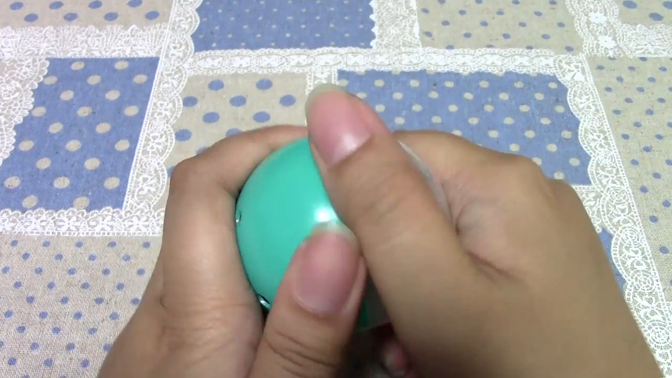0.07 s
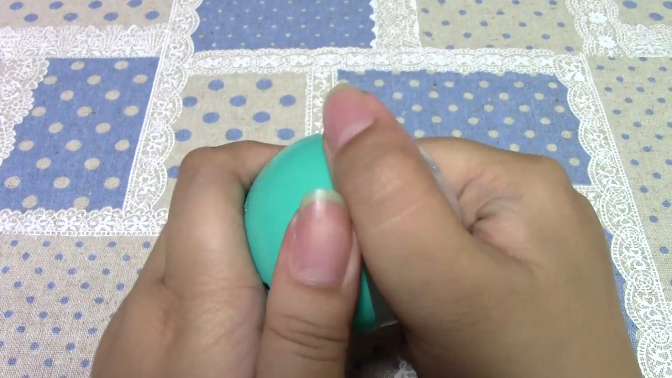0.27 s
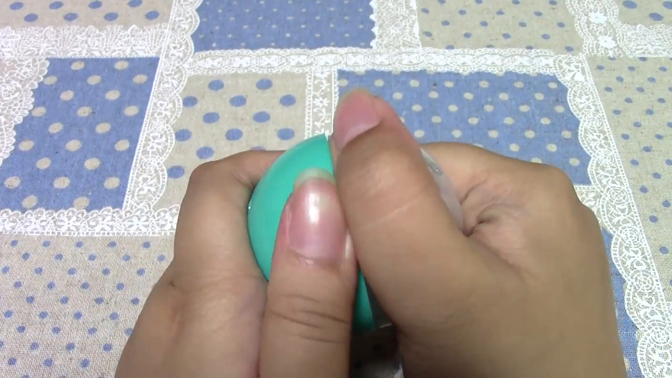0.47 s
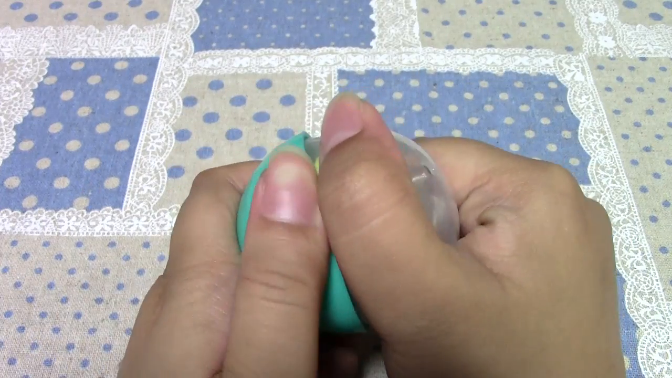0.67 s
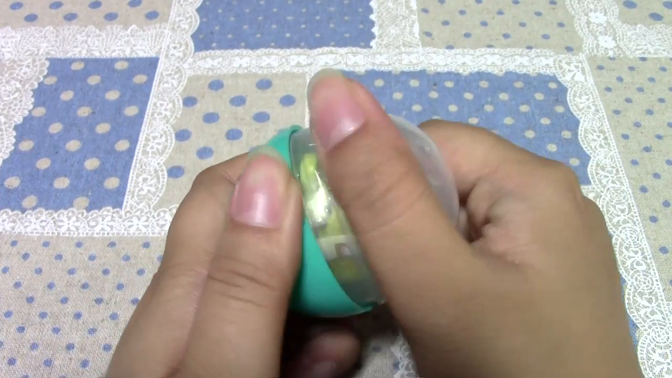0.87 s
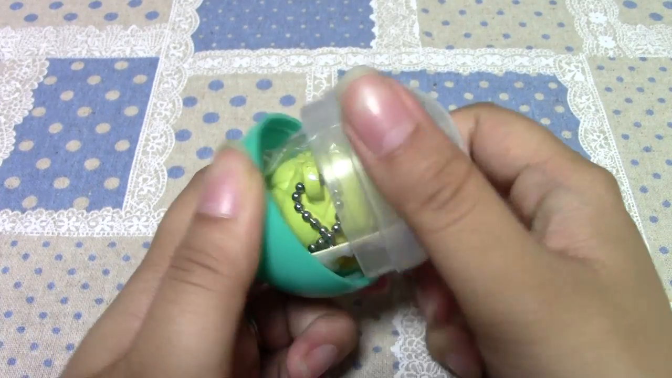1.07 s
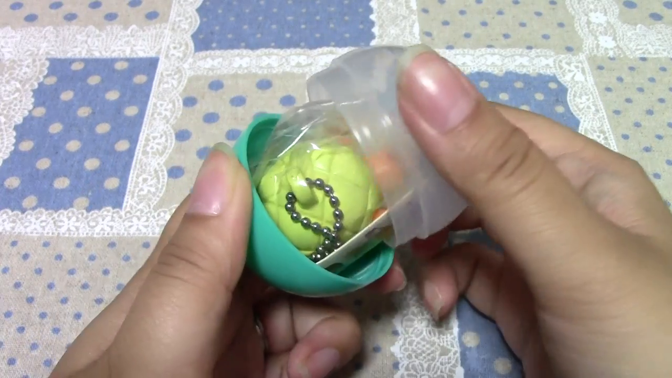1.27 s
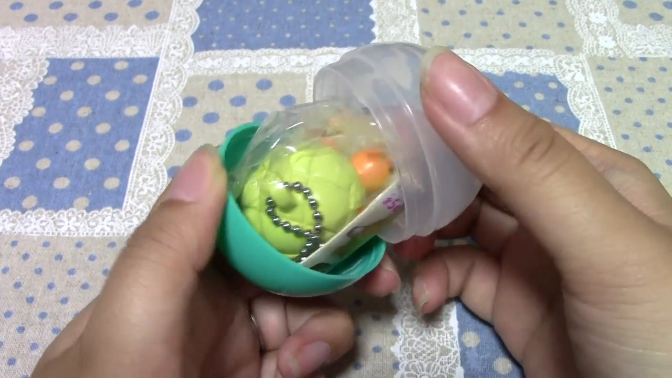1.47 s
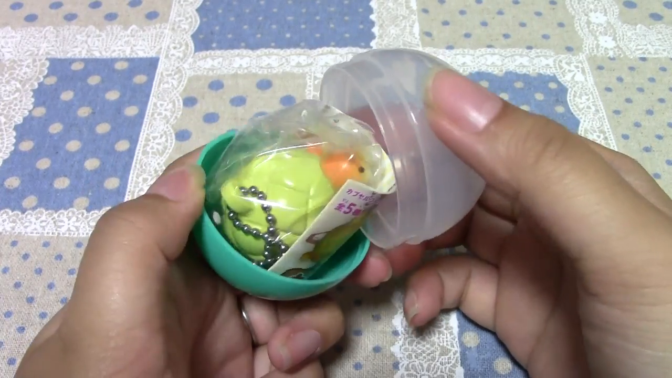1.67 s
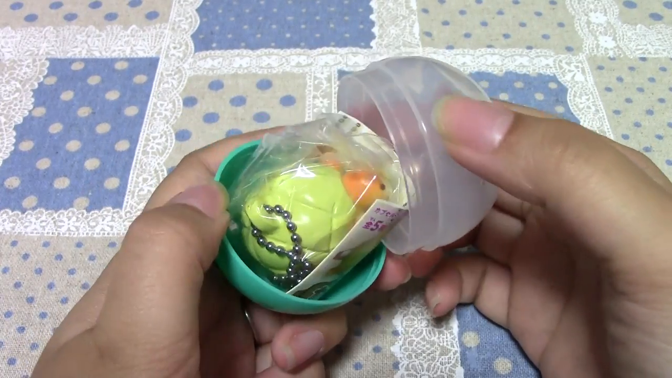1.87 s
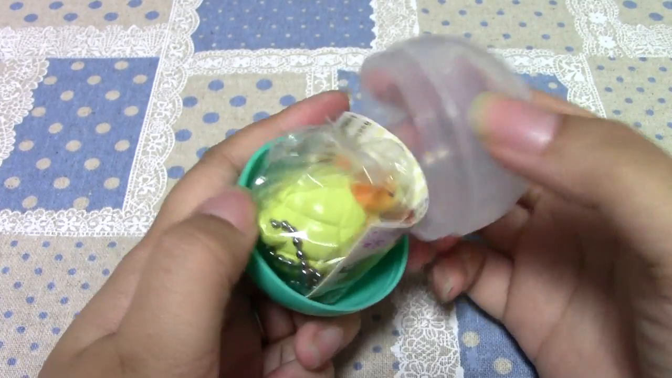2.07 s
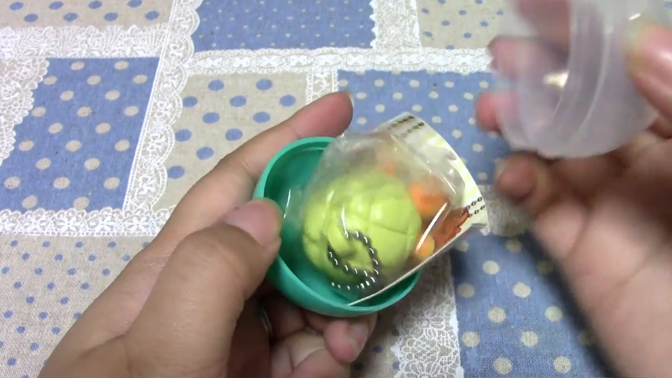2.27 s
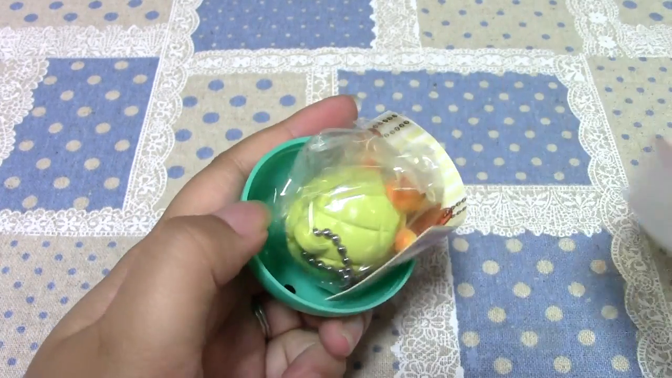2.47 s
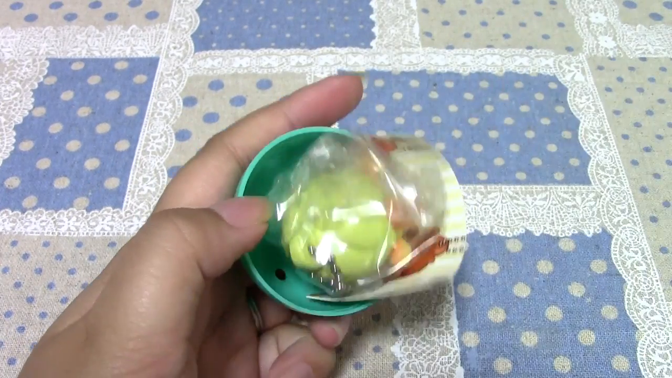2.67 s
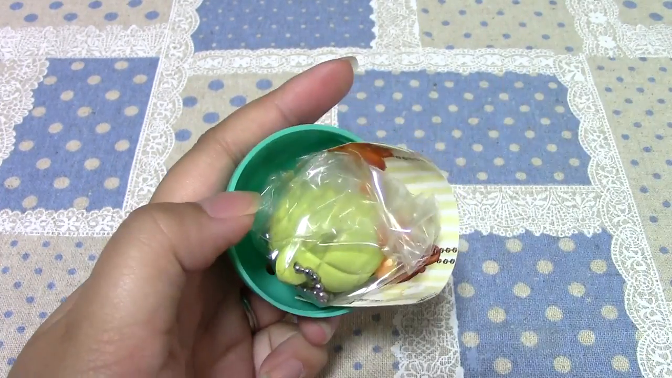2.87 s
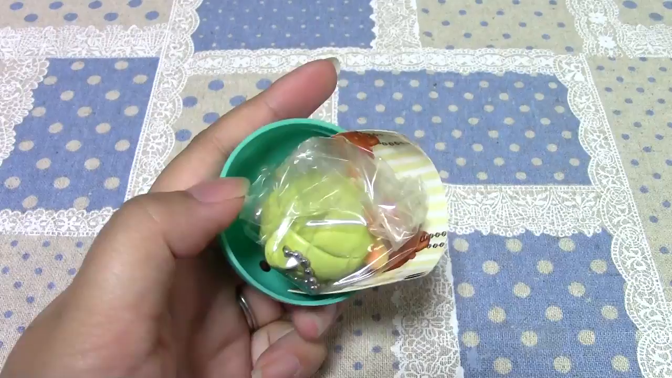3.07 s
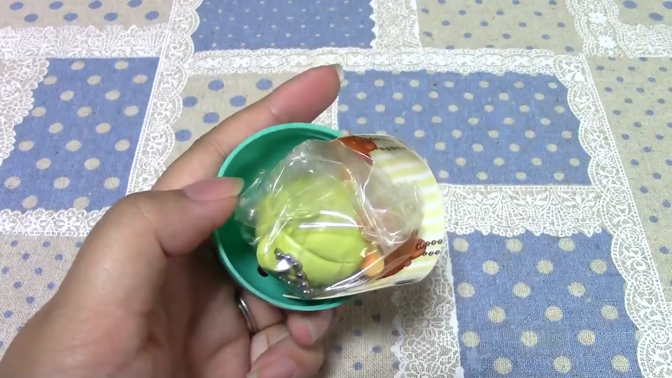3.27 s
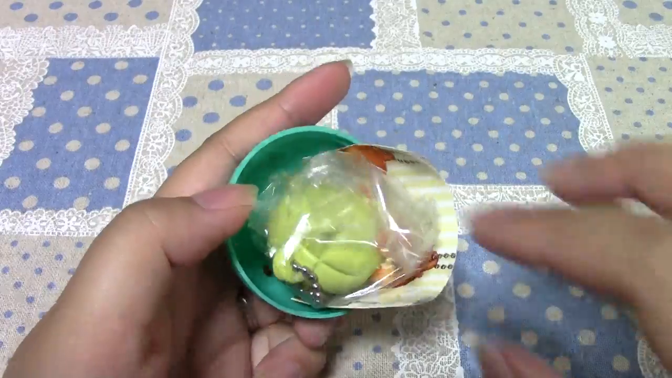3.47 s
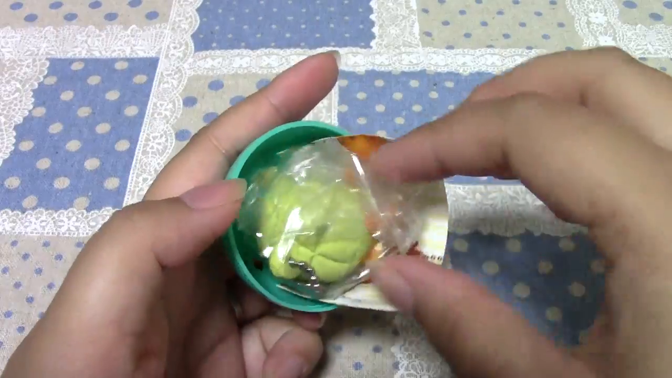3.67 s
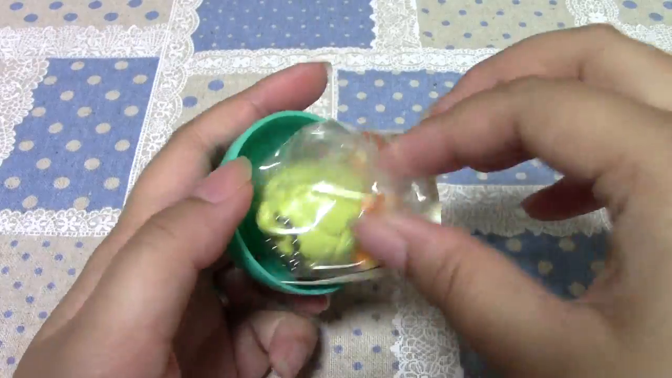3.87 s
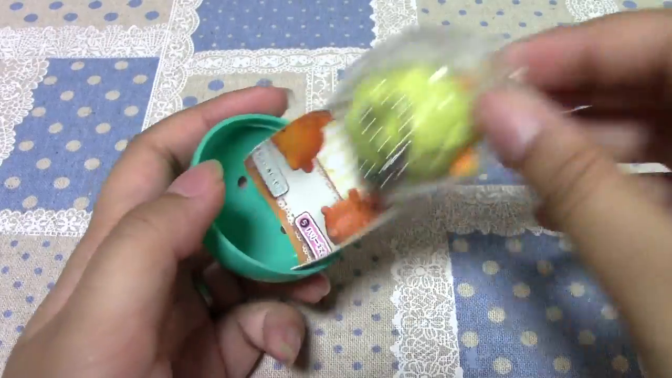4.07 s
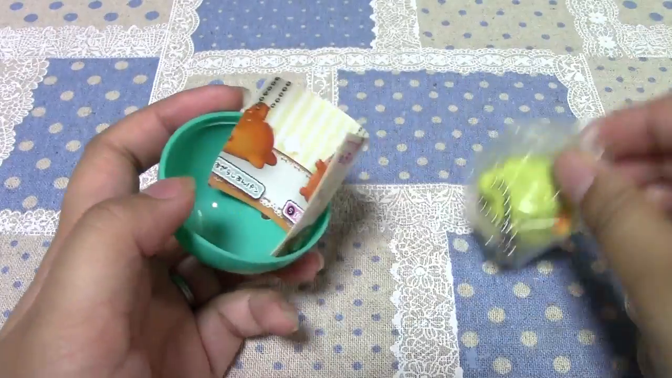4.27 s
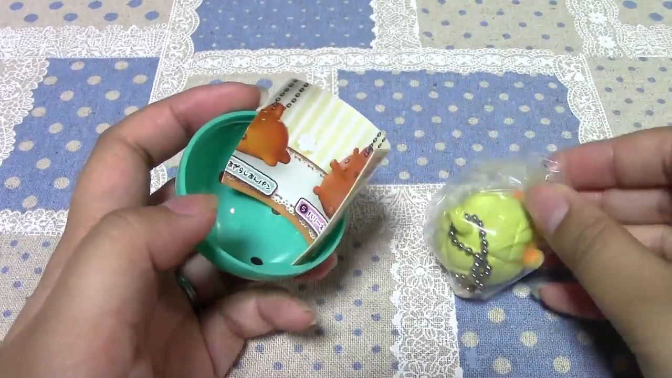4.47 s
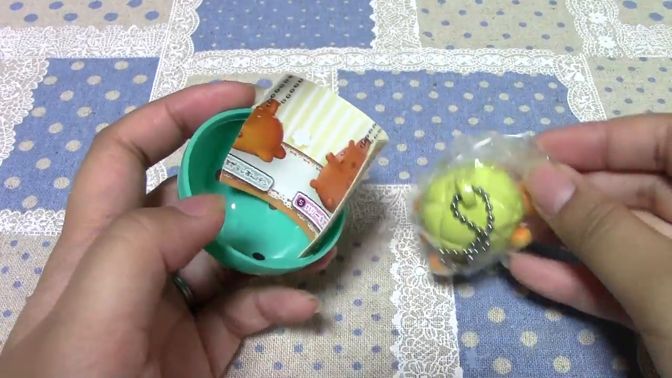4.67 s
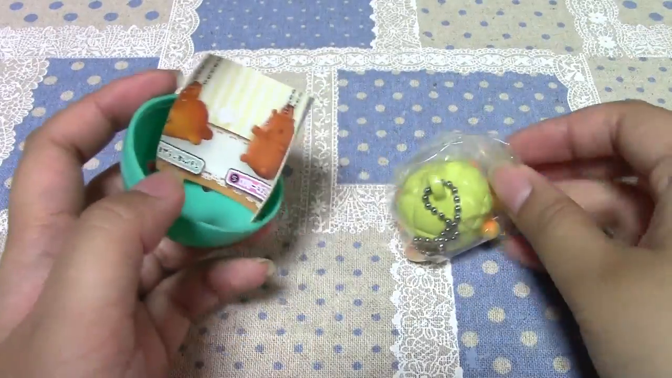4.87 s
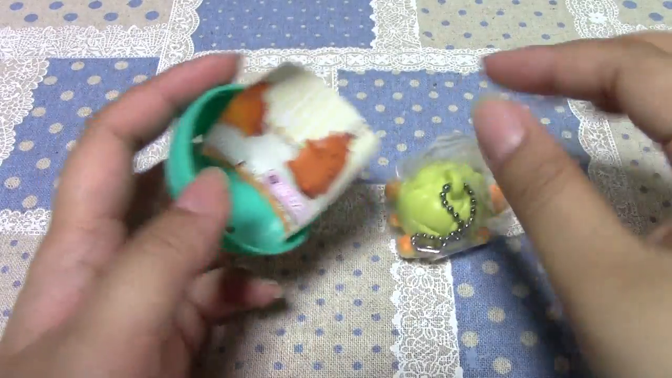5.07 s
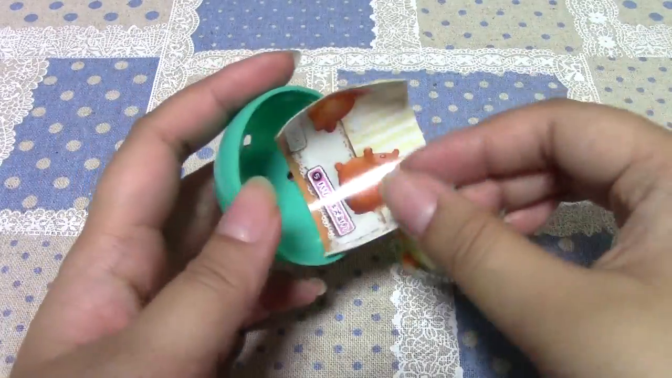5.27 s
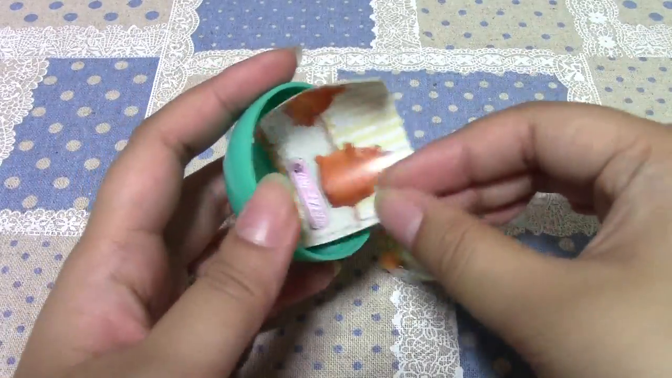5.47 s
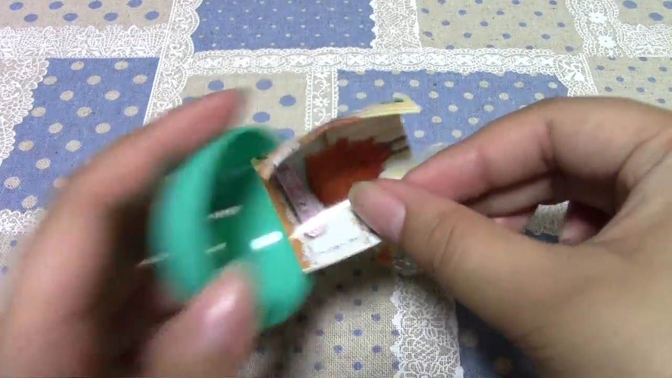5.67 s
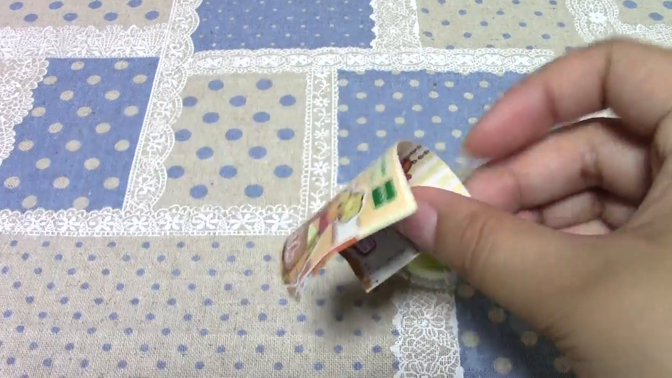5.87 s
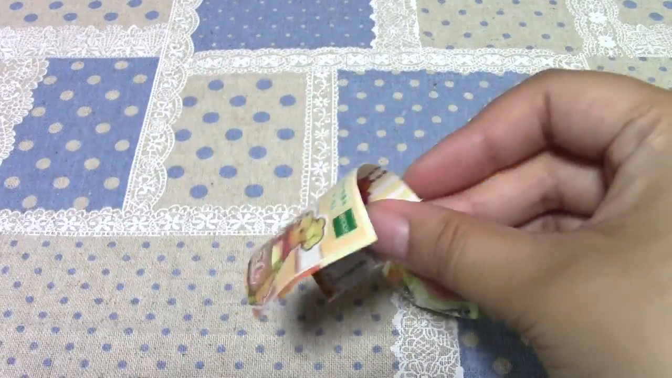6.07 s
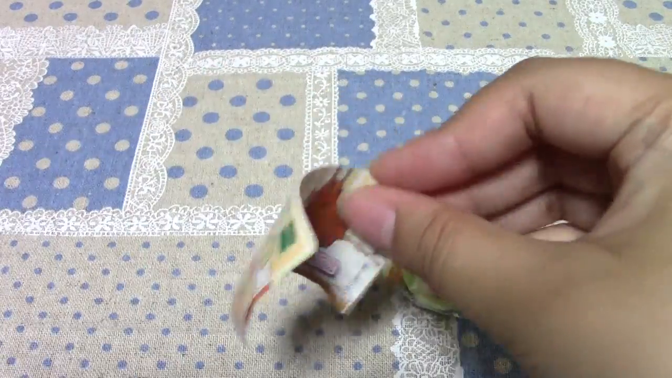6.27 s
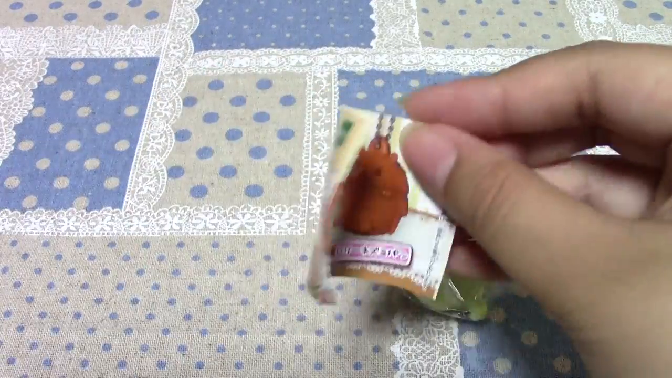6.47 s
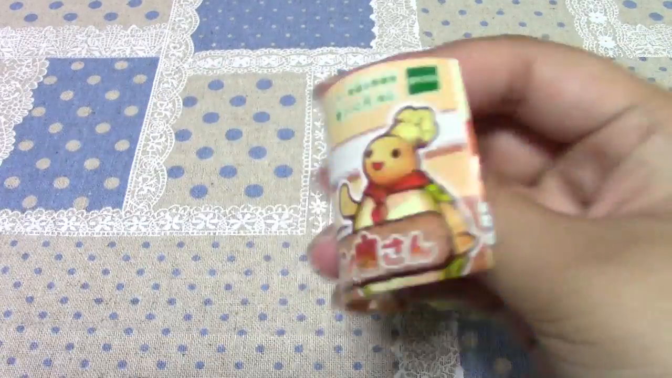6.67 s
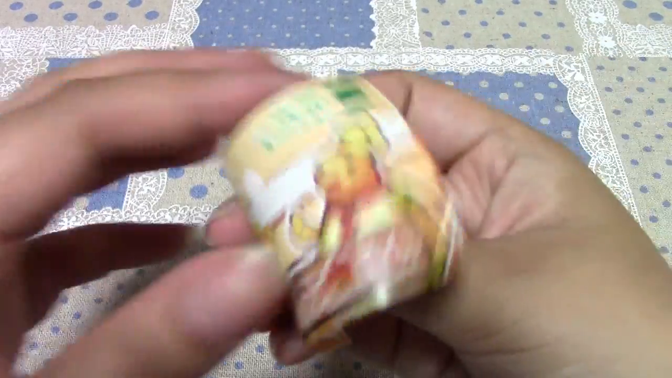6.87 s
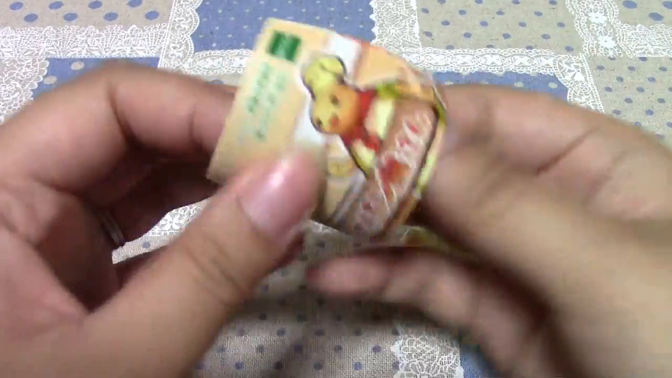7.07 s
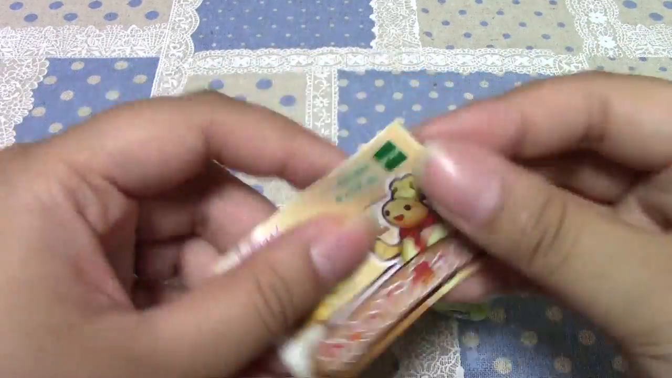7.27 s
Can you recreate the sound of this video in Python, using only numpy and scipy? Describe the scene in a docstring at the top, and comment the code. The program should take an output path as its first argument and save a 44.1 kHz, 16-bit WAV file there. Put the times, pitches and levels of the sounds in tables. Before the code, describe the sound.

Close handling in a quiet room: sharp plastic snap, crisp film crackles, small knocks on a cloth-covered table, a short hollow clatter, papery rustles and flicks.

```python
"""A quiet room with a cloth-covered table: hands pop a plastic toy capsule open close to the microphone.
The toy in its thin bag is lifted out and set down, crinkling; a paper insert is pulled out and unrolled,
and an empty capsule half lands with a short clatter. Plastic is made from cracks and damped resonances,
film and paper from friction hiss, stick-slip grains and ringing creases, the landing from ticks, shell
modes and a noise rattle; a faint room tail and a humming room tone lie underneath."""
import sys
import numpy as np
from scipy import signal
from scipy.fft import rfft, irfft, next_fast_len
from scipy.io import wavfile
from scipy.ndimage import uniform_filter1d

SR = 44100
rng = np.random.default_rng(int(sys.argv[2]) if len(sys.argv) > 2 else 0)


def wav_out(sig):
    """Save sig, one row per channel (or a flat mono array), as 16-bit PCM at SR to the path in sys.argv[1]."""
    wavfile.write(sys.argv[1], SR, np.round(np.clip(np.atleast_2d(sig).T, -1, 1) * 32767).astype(np.int16))


N = 322805

# Colour of the room's air noise. Each row: frequency in Hz, relative density in dB per Hz.
ROOM_TONE_SPECTRUM = [(20, -81.5), (48, -75), (100, -77.5), (150, -76), (300, -83), (600, -83),
                      (750, -84.5), (950, -86.5), (1200, -86.5), (2200, -93), (5500, -99), (8000, -102),
                      (12000, -105), (16000, -111)]
# Steady hum of the room. Each row: frequency in Hz, level in dB.
HUM_LINES = [(697, -71), (728, -67), (825, -69)]
# Likeness of the room tone at the two microphone ports. Each row: frequency in Hz, correlation from 0 to 1.
PORT_LIKENESS = [(40, 0.99), (150, 0.64), (300, 0.037), (700, 0.47), (3000, 0.76), (12000, 0.6)]
# Ring time of the room tail. Each row: frequency in Hz, time to fall 60 dB in seconds.
ROOM_RING_TIME = [(200, 0.91), (1000, 0.37), (4000, 0.46), (14000, 0.12)]

# Soft bumps of hands, toy and shell. Each row: start in seconds, level in dB, pitch in Hz.
BUMP_EVENTS = [(2.951, -41, 313), (2.959, -40.5, 220), (4.97, -41.5, 176), (6.352, -35.5, 95),
               (6.375, -33, 480), (6.629, -42.5, 290), (6.753, -42, 264), (7.2795, -27, 450)]
# Hollow plastic or curled paper scraping. Each row: start in seconds, level in dB, resonance in Hz,
# resonance width in Hz, rise in ms, decay in ms.
SCRAPE_EVENTS = [(.696, -24, 1140, 700, 7.9, 5.2), (0.962, -32, 1250, 650, 8.1, 4),
                 (1.029, -42.5, 1400, 1490, 2.6, 3), (0.984, -36, 1160, 260, 5.1, 12),
                 (1.15, -58.5, 1850, 400, 59, 220), (4.459, -35, 730, 880, 9.6, 31),
                 (6.373, -30, 1460, 450, 7.6, 14), (6.506, -42.5, 1044, 1130, 6.2, 23),
                 (7.051, -44, 3950, 600, 16, 42), (7.14, -45, 4550, 1400, 40, 22),
                 (7.186, -43, 2960, 1200, 17, 11)]
# Paper edges flicking past a finger. Each row: start in seconds, level in dB, rise in ms, decay in ms.
FLICK_EVENTS = [(6.801, -27.5, 3.4, 5.9), (7.0255, -35.5, 0.83, 1.8), (7.063, -27, 8.5, 8.4),
                (7.28, -20, 0.4, 2.7)]

# The empty shell touching down. Each row: contact time in seconds, rattle level in dB, tick level in dB.
LANDING_CONTACTS = [(6.3493, -32.5, -26.5), (6.3536, -29.5, -30), (6.363, -42, -34.5), (6.3765, -31, -48)]
# Modes of the empty shell. Each row: frequency in Hz, sine peak in dB against the rattle's early rms,
# time to fall 60 dB in seconds.
SHELL_RING = [(1080, -1, 0.2), (1446, -6, 0.16), (2772, -21, 0.21)]
# Colour of the landing rattle. Each row: frequency in Hz, relative density in dB per Hz.
RATTLE_SPECTRUM = [(40, -11), (85, -1.5), (200, -15), (480, -2), (800, -6.5), (1200, -0.5), (1600, -3.5),
                   (2200, -7.5), (4200, -16), (6000, -17), (10000, -26), (16000, -37)]
# Ring time of the landing rattle. Each row: frequency in Hz, time to fall 60 dB in seconds.
RATTLE_RING_TIME = [(100, 0.19), (1300, 0.27), (4000, 0.27), (12000, 0.22)]

# Fingers sliding along the paper insert: drawn out, regripped, turned over, unrolled. Each row: middle in
# seconds, length in seconds, level in dB, small creases per second (a count that rounds to zero gives none).
PAPER_SLIDES = [(5.435, 0.17, -53.5, 0), (5.65, 0.12, -47.5, -2), (5.765, 0.097, -49, 0),
                (6.0, 0.052, -44.5, 0), (6.13, 0.24, -61, 13.5), (6.18, 0.021, -46.5, 0),
                (6.28, 0.026, -51, 120), (6.5, 0.5, -57.5, 8), (6.825, 0.064, -53, 0),
                (7.085, 0.045, -40, 0), (7.192, 0.069, -41, 0), (7.255, 0.029, -43, -2),
                (7.312, 0.043, -41.5, 0)]
# Fingers sliding on the capsule and the bag: gripping, unfolding, lifting, setting down, letting go. Each row:
# middle in seconds, length in seconds, level in dB, small creases per second (rounding to zero gives none).
FILM_SLIDES = [(0.7, 2.7, -61.5, 7), (0.48, 0.16, -57, 0), (1.23, 0.14, -57, 25), (2.222, 0.051, -47, 60),
               (2.29, 0.15, -52, 1.5), (2.48, 0.17, -53.5, 0), (2.776, 0.02, -49.5, -6),
               (2.862, 0.041, -47, 0), (3.17, 0.11, -61.5, 15), (3.775, 0.06, -45, 0),
               (3.838, 0.095, -44, 90), (4.01, 0.14, -46.5, 130), (4.098, 0.028, -52.5, 120),
               (4.31, 0.13, -54, 35), (4.402, 0.028, -53.5, 0), (4.484, 0.034, -36.5, 0),
               (4.534, 0.04, -46, -2), (4.705, 0.12, -51, 40), (4.858, 0.06, -51.5, 0.5),
               (4.995, 0.081, -46, 0), (5.096, 0.087, -44.5, 0), (5.215, 0.12, -57, 0)]
# Colour of rubbed paper. Each row: frequency in Hz, relative density in dB per Hz.
PAPER_SPECTRUM = [(200, -15), (700, -13.5), (1600, -7.5), (2700, 2), (3200, -0.5), (3900, 3), (5300, -4.5),
                  (7000, -2), (11000, 1.5), (16000, -5)]
# Colour of rubbed film. Each row: frequency in Hz, relative density in dB per Hz.
FILM_SPECTRUM = [(200, -43), (700, -1.5), (1500, -3.5), (2600, -0.5), (3500, -1.5), (5300, -6.5),
                 (7300, -1.5), (10500, -3.5), (13000, -4), (16000, -10)]

# Big creases of film or paper snapping over. Each row: start in seconds, ring level in dB, ring pitch in Hz,
# treble tick level in dB, level in dB of what it lies on.
BIG_CREASES = [(1.2443, -57, 4570, -42.5, -63), (2.2207, -47, 3000, -45, -45.5),
               (2.411, -49, 2000, -49, -46), (2.681, -53, 2540, -52.5, -52), (3.595, -66, 1900, -52, -58),
               (3.7317, -38.5, 2800, -36.5, -56), (3.7412, -15.5, 2740, -21.5, -31),
               (3.78, -47, 3440, -35.5, -45), (3.801, -47, 2800, -41, -52), (3.9273, -41, 2686, -45, -52),
               (3.951, -45, 2940, -40, -58), (3.984, -39, 2650, -53, -56), (4.022, -33, 2965, -32.5, -56),
               (4.0401, -37, 3000, -37, -44), (4.0423, -35, 2560, -33, -57),
               (4.3129, -48, 3980, -44, -47.5), (4.328, -56, 1950, -35, -65),
               (4.38, -32.5, 3100, -26.5, -36), (4.5314, -44, 3950, -39, -52.5),
               (4.6865, -39, 3350, -44.5, -51), (4.9666, -38, 3820, -41, -56), (4.974, -38, 3360, -40, -41),
               (5.071, -40, 3020, -39, -45), (5.0752, -40, 3560, -39, -36), (5.1053, -38, 3970, -42, -40),
               (5.1107, -38, 3980, -40, -42.5), (5.159, -32, 3470, -30, -45),
               (5.3746, -27.5, 3470, -31, -34.5), (5.452, -47, 2580, -47.5, -48),
               (5.862, -43, 4700, -51.5, -71), (6.3047, -41, 3400, -52, -44.5),
               (6.3272, -46, 3300, -50, -69), (6.794, -39, 3780, -50, -50), (6.8502, -44, 3870, -53, -53),
               (7.273, -52, 2400, -44, -58), (7.2809, -24, 2140, -27.5, -48)]
# Colour of a sharp treble tick. Each row: frequency in Hz, relative density in dB per Hz.
TICK_SPECTRUM = [(1500, -17), (4500, 0), (6500, 10), (9500, 5.5), (12500, 1.5), (16000, -10.5)]
# Colour of what a crease lies on. Each row: frequency in Hz, relative density in dB per Hz.
BODY_SPECTRUM = [(150, -44), (500, 1), (750, 10.5), (1200, 7.5), (1800, 3.5), (3500, -9.5)]

# Hard plastic knocks. Each row: start in seconds, hollow ring level in dB, hollow pitch in Hz, crack level
# in dB, crack rise and decay (one value for both) in ms, rim ping level in dB, rim pitch in Hz.
CAPSULE_KNOCKS = [(0.6577, -9.5, 950, -21.5, 0.44, -25, 6750), (0.7035, -28, 1140, -58, 0.87, -62, 8000),
                  (0.711, -11, 1060, -26, 0.38, -20.5, 8000), (0.7315, -29, 990, -30, 1.2, -37, 9400),
                  (0.9675, -29, 1090, -33, 1.1, -42, 8800), (4.4817, -27, 794, -31.5, 0.96, -38, 6800),
                  (4.4955, -33.5, 706, -50, 1.2, -45, 7000), (4.5125, -36, 1000, -36.5, 0.42, -44, 6500),
                  (4.5389, -39.5, 1050, -36.5, 0.75, -40, 6300), (5.6235, -38, 740, -32, 0.35, -45, 4840)]
# Colour of a plastic crack. Each row: frequency in Hz, relative density in dB per Hz.
CRACK_SPECTRUM = [(150, -5), (600, 6.5), (1600, 8), (2600, -1), (3200, 10.5), (3900, 0), (4600, 6),
                  (8000, -1), (10000, 6), (12000, -8.5), (16000, -11)]

TIME = np.arange(N) / SR
HIT_MS = np.arange(2048) * 1000 / SR  # time axis of a short sound
HIT_SAMPLES = 0.005 * SR  # 5 ms, the span to which a hit's level refers
GRAIN_HZ = np.geomspace(2000, 14000, 14)  # pitches of the stick-slip facets
BUMP_CYCLES = 0.4  # decay time of a bump, in cycles of its pitch
STROKE_STEEP = 3.1  # exponent: how abruptly a stroke starts and stops
# treble above this pitch shifts by this many dB for each dB a stroke is above or below the firm level
TREBLE_HZ, FIRM_DB, BRIGHTEN = 10700, -25, 0.24
RIM_RING_MS, KNOCK_RING_MS = 0.15, 0.62  # decay times of the rim's ping and of the hollow
HOLLOW_BAND_HZ = (510, 2440)  # the hollow radiates little outside this band
EDGE_HZ = 16300  # upper band limit of the output


def amp(db):
    """Decibels to gain."""
    return 10 ** (np.asarray(db) / 20)


def unit(x):
    """Scales to rms 1."""
    return x / np.sqrt(np.mean(x ** 2) + 1e-20)


def read(points, hz):
    """Reads a table on a log-frequency axis."""
    f, value = np.transpose(points)
    return np.interp(np.log(hz + 1), np.log(f), value)


def add(mix, s, sound):
    """Mixes a sound in at time s."""
    part = mix[round(s * SR):][:len(sound)]
    part += sound[:len(part)]


def colour(x, spectrum):
    """Causal (minimum-phase) filter with the given spectrum, so attacks stay sharp."""
    size = next_fast_len(len(x) + 2048)
    hz = abs(np.fft.fftfreq(size, 1 / SR))
    log_gain = np.log(amp(read(spectrum, hz)))
    response = np.exp(np.conj(signal.hilbert(log_gain)))
    return np.fft.ifft(np.fft.fft(x, size) * response).real[:len(x)]


def hit(x, db):
    """Gives a short sound the energy of 5 ms at this level."""
    return amp(db) * x * np.sqrt(HIT_SAMPLES / (np.sum(x ** 2) + 1e-20))


def swell(ms, rise_ms, decay_ms):
    """A straight rise and an exponential fall."""
    return np.minimum(ms / rise_ms, 1) * np.exp(-np.maximum(ms - rise_ms, 0) / decay_ms)


def ring(hz, decay_ms):
    """A heavily damped resonance that swells for one decay time and dies; it radiates little below its pitch."""
    envelope = HIT_MS * np.exp(-HIT_MS / decay_ms)
    motion = envelope * np.cos(2 * np.pi * hz * np.arange(len(HIT_MS)) / SR)
    return np.gradient(motion) * SR / (2 * np.pi * hz)


def burst(spectrum, decay_ms, lead):
    """A fast-dying scatter of noise behind one sharp release, whose strength is lead (0 for none)."""
    scatter = hit(rng.standard_normal(len(HIT_MS)) * np.exp(-HIT_MS / decay_ms), 0)
    scatter[0] = lead * np.sqrt(HIT_SAMPLES)
    return colour(scatter, spectrum)


def die_away(x, t60):
    """Lets each band of x decay at its own speed."""
    hz, t, z = signal.stft(x, SR, nperseg=256)
    decay = amp(-60 * t / read(t60, hz)[:, None])
    return signal.istft(z * decay, SR, nperseg=256)[1]


def room_tone(db=-51.5, hum_width_hz=8):
    """Low steady air noise, partly alike at both ports, with a few wavering hum lines of narrow-band noise."""
    hz = np.fft.rfftfreq(N, 1 / SR)
    alike = np.clip(read(PORT_LIKENESS, hz), 0, 1)
    mid, side = rfft(rng.standard_normal((2, N))) * amp(read(ROOM_TONE_SPECTRUM, hz))
    side = side * np.sqrt((1 - alike) / (1 + alike))
    air = amp(db) * unit(irfft(np.array([mid + side, mid - side]), N))
    hum = np.zeros(N)
    for line_hz, line_db in HUM_LINES:
        line = mid / (1 + ((hz - line_hz) / hum_width_hz) ** 2) * 1j  # a quarter turn from the air noise
        hum += amp(line_db) * unit(irfft(line, N))
    return air + hum


def room(x, tail_db=-19, gap_s=0.0017):
    """A small furnished room: a faint diffuse tail that fades in over a short gap, slightly different at each port."""
    noise = rng.standard_normal((3, SR // 2))
    tails = die_away(noise[0] + 0.038 * noise[1:], ROOM_RING_TIME)
    tails *= np.minimum(np.arange(tails.shape[1]) / SR / gap_s, 1) ** 2
    tails /= np.linalg.norm(tails[0])
    return amp(tail_db) * signal.fftconvolve(x[None], tails, axes=1)[:, :N]


def ports(x, lag=0.11, balance_db=0.13):
    """Two close microphone ports: the sound reaches the first a fraction of a sample earlier, slightly softer."""
    skew = lag * np.gradient(x)  # lag in samples, either way
    return np.array([(x + skew) * amp(-balance_db), (x - skew) * amp(balance_db)])


def bumps():
    """Dull knocks with hardly any ring."""
    out = np.zeros(N)
    for s, db, hz in BUMP_EVENTS:
        add(out, s, hit(ring(hz, 1000 * BUMP_CYCLES / hz), db))
    return out


def scrapes():
    """Friction noise drives the air resonance of a hollow shell."""
    out, ms = np.zeros(N), np.arange(SR // 2) * 1000 / SR
    for s, db, hz, width_hz, rise_ms, decay_ms in SCRAPE_EVENTS:
        shell = signal.iirpeak(hz, hz / width_hz, fs=SR)
        sound = signal.lfilter(*shell, rng.standard_normal(len(ms)))
        sound = signal.lfilter(*shell, sound)
        shape = swell(ms, rise_ms, decay_ms)
        add(out, s, amp(db) * unit(sound * shape) * np.sqrt(np.mean(shape ** 2)))
    return out


def flicks():
    """A paper edge scrapes over skin and springs free: paper-coloured noise under a swell."""
    out = np.zeros(N)
    for s, db, rise_ms, decay_ms in FLICK_EVENTS:
        hiss = unit(colour(rng.standard_normal(len(HIT_MS)), PAPER_SPECTRUM))
        add(out, s, amp(db) * swell(HIT_MS, rise_ms, decay_ms) * hiss)
    return out


def clatter(tick_ms=3.3):
    """The empty shell lands and rocks: each contact ticks, rings the shell and starts a dense rattle."""
    out, t = np.zeros(N), np.arange(SR // 2) / SR
    shell = sum(amp(db - 60 * t / t60) * np.sin(2 * np.pi * hz * t) for hz, db, t60 in SHELL_RING)
    for s, db, tick_db in LANDING_CONTACTS:
        rattle = colour(die_away(rng.standard_normal(len(t)), RATTLE_RING_TIME), RATTLE_SPECTRUM)
        add(out, s, amp(db) * rattle / np.std(rattle[:SR // 40]))  # level of the first 25 ms
        add(out, s, amp(db) * shell)
        add(out, s, hit(burst(TICK_SPECTRUM, tick_ms, lead=0), tick_db))
    return out


def speed(s, middle, length):
    """A finger gathers pace, glides and slows to rest; length is the time spent above half speed."""
    return 1 / (1 + abs(2 * (s - middle) / length) ** STROKE_STEEP)


def friction(strokes):
    """Loudness of the sliding over time: overlapping strokes add in power."""
    return np.sqrt(sum((amp(db) * speed(TIME, middle, length)) ** 2 for middle, length, db, _ in strokes))


def rub(level, spectrum, grain_db, grains_per_s, spread_db, flutter_db, facet_q=1.3):
    """Sliding sheets: friction hiss and tiny stick-slip snaps, each ringing a facet's pitch; firmer is brighter."""
    sizes = amp(spread_db * np.minimum(rng.exponential(1, N), 3.5))
    snaps = (rng.random(N) < grains_per_s / SR) * rng.choice([-1, 1], N) * sizes
    facet = rng.integers(0, len(GRAIN_HZ), N)
    grains = np.zeros(N)
    for k, hz in enumerate(GRAIN_HZ):
        grains += signal.lfilter(*signal.iirpeak(hz, facet_q, fs=SR), snaps * (facet == k))
    drive = rng.standard_normal(N) + amp(grain_db) * unit(grains)
    # noise smoothed over a few ms makes the level flutter
    flutter = uniform_filter1d(rng.standard_normal(N), size=300)
    flutter = unit(uniform_filter1d(flutter, size=200))
    sound = unit(colour(drive, spectrum))
    body = signal.filtfilt(*signal.butter(2, TREBLE_HZ, fs=SR), sound)
    treble = (sound - body) * (level / amp(FIRM_DB)) ** BRIGHTEN
    return level * amp(flutter_db * flutter) * (body + treble)


def crease(ring_db, hz, tick_db, body_db):
    """A buckling facet ticks, rings for a few cycles and shakes whatever it lies on."""
    facet = ring(hz, 0.33) + 0.15 * ring(hz * 0.835, 0.56) + 0.076 * ring(hz * 1.42, 0.86)
    tick = burst(TICK_SPECTRUM, 1.0, lead=1.0)
    body = burst(BODY_SPECTRUM, 1.0, lead=0.5)
    return hit(facet, ring_db) + hit(tick, tick_db) + hit(body, body_db)


def crinkles(strokes, over_db, spread_db, hz, octaves, tick_db, body_db):
    """Small creases give way at uneven intervals during a stroke, louder where it is firm and fast."""
    out = np.zeros(N)
    for (middle, length, db, per_s), draws in zip(strokes, rng.random((len(strokes), 32, 3))):
        count = min(round(per_s * length), len(draws))
        for k, (when, size, pitch) in enumerate(draws[:count]):
            s = middle + length * ((k + when) / count - 0.5)
            ring_db = db + over_db + spread_db * (size - 0.5)
            crease_hz = hz * 2 ** (octaves * (pitch - 0.5))
            snap = crease(ring_db, crease_hz, ring_db + tick_db, ring_db + body_db)
            add(out, s, speed(s, middle, length) * snap)
    return out


def paper():
    """The insert: rubbing fibres plus small creases of widely varied pitch."""
    hiss = rub(friction(PAPER_SLIDES), PAPER_SPECTRUM, grain_db=-3.5, grains_per_s=1600,
               spread_db=2.5, flutter_db=2.5)
    return hiss + crinkles(PAPER_SLIDES, over_db=6.5, spread_db=3, hz=2930, octaves=0.75,
                           tick_db=0.5, body_db=-20)


def film():
    """Capsule and thin bag under the fingers: rubbing plus small creases of nearly equal pitch."""
    hiss = rub(friction(FILM_SLIDES), FILM_SPECTRUM, grain_db=-1.5, grains_per_s=1200,
               spread_db=2.0, flutter_db=3.0)
    return hiss + crinkles(FILM_SLIDES, over_db=-1.5, spread_db=2.5, hz=2800, octaves=0.22,
                           tick_db=2.0, body_db=-3)


def creases():
    """The big creases, each a facet that buckles and rings."""
    out = np.zeros(N)
    for s, *snap in BIG_CREASES:
        add(out, s, crease(*snap))
    return out


def capsule():
    """Hard plastic slips or strikes with a crack and a brief ping of the rim; the hollow answers with a low pop."""
    out = np.zeros(N)
    hollow_band = signal.butter(2, HOLLOW_BAND_HZ, "bandpass", fs=SR)
    for s, ring_db, hz, crack_db, crack_ms, rim_db, rim_hz in CAPSULE_KNOCKS:
        slip = rng.standard_normal(len(HIT_MS)) * swell(HIT_MS, crack_ms, crack_ms)
        add(out, s, hit(colour(slip, CRACK_SPECTRUM), crack_db))
        add(out, s, hit(ring(rim_hz, RIM_RING_MS), rim_db))
        hollow = signal.lfilter(*hollow_band, ring(hz, KNOCK_RING_MS))
        add(out, s + crack_ms / 1000, hit(hollow, ring_db))  # answers once the crack has risen
    return out


def scene():
    """All the sounds are mixed at the centre, through the same two ports and room: the hands work just in front
    of the microphone, while the empty shell lands further off."""
    near = bumps() + scrapes() + flicks() + clatter() + paper() + film() + creases() + capsule()
    return room_tone() + room(near) + ports(near)


def record(dry):
    """The loudest peaks are rounded off; then the band limit."""
    rounded = dry / (1 + (dry / 0.95) ** 6) ** (1 / 6)
    lowpass = signal.firwin(255, EDGE_HZ, window=("kaiser", 9), fs=SR)
    return signal.oaconvolve(rounded, lowpass[None], "same")


dry = scene()
out = record(dry)
wav_out(out)
```